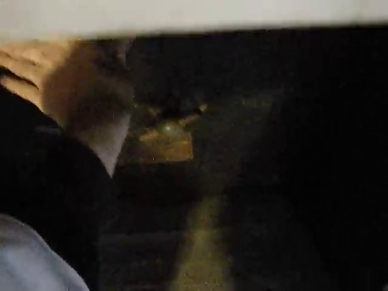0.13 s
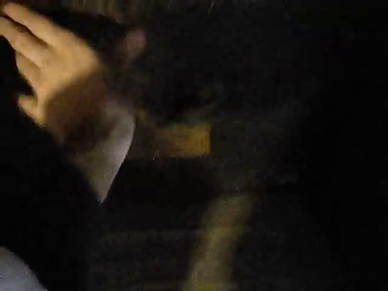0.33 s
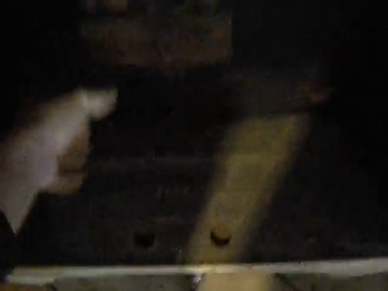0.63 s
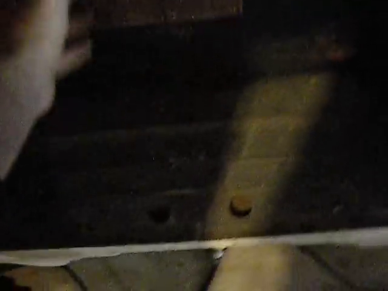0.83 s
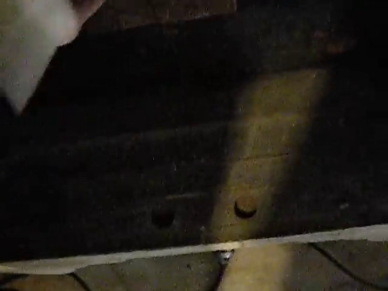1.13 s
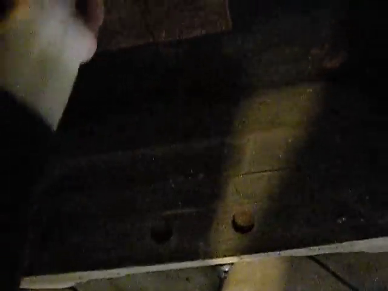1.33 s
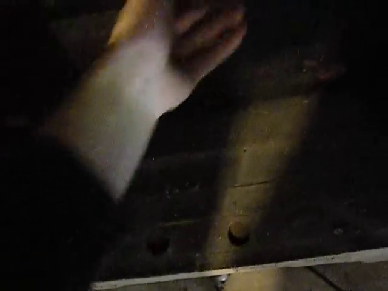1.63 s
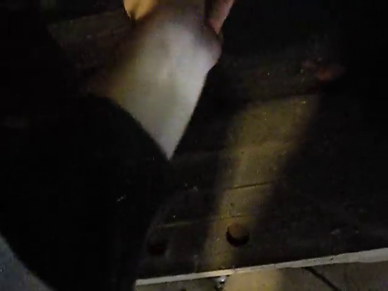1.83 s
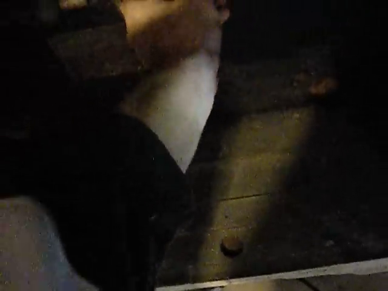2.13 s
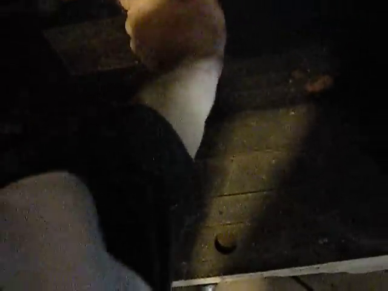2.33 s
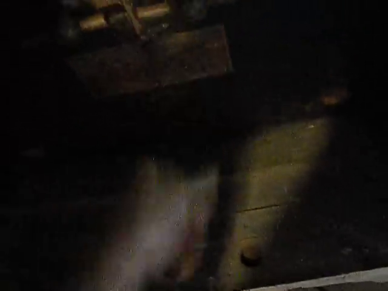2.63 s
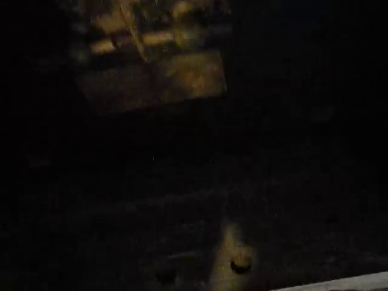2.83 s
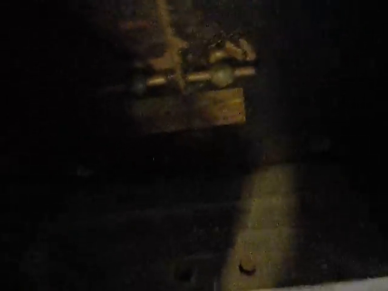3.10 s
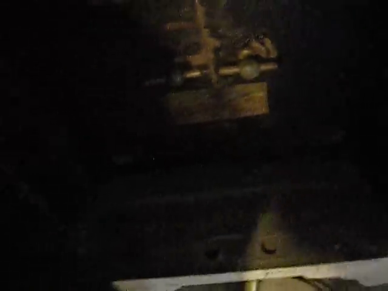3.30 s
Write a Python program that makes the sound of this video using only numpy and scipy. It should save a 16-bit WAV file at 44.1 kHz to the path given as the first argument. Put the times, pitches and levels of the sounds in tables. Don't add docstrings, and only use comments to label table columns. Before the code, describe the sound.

Heavy steel bolts are worked by hand: a soft booming door bump first, a pause, then clusters of hard clacks and a tiny squeak, in a small hard room with a droning fan; muffled hand-held microphone.

```python
import sys
import numpy as np
from scipy import signal
from scipy.fft import rfft, irfft, next_fast_len
from scipy.io import wavfile
from scipy.ndimage import uniform_filter1d, map_coordinates

SR = 44100
rng = np.random.default_rng(int(sys.argv[2]) if len(sys.argv) > 2 else 0)


def waveform_to_disk(signal):
    frames = np.transpose(np.atleast_2d(signal))
    scaled = np.clip(frames, -1, 1) * 32767
    samples = np.round(scaled).astype(np.int16)
    wavfile.write(sys.argv[1], SR, samples)


def nominal_scale(level):
    x = np.asarray(level, float) / 20
    return 10 ** x


N = 152586

# start_s, peak_db, boom_db (door against bolts), rattle_t60_s, chatter_centre_hz
BOLT_BLOWS = [(1.2902, -8.5, -14, 0.092, 2090), (1.297, -7, -2.5, 0.093, 1300),
              (1.306, -8.5, -4.5, 0.038, 2920), (1.349, -13, 2.5, 0.089, 2400),
              (1.365, -7.5, -23, 0.057, 3200), (1.3685, 5.5, -25.5, 0.029, 2320),
              (1.3735, -3.5, -10.5, 0.055, 2050), (1.3925, 1.5, -9, 0.03, 2720),
              (1.498, -25, 12.5, 0.022, 800), (1.512, -21.5, 7, 0.085, 2636),
              (1.6065, -29.5, 7.5, 0.062, 2180), (1.903, -14, -14.5, 0.063, 2360),
              (1.929, -8.5, 5.5, 0.07, 1700), (1.941, -7.5, -5, 0.073, 2300), (1.9795, -1, 0.5, .04, 2000),
              (1.984, -3.5, -9.5, 0.055, 2470), (2.001, -1.5, -4, 0.056, 3150),
              (2.1325, 13, -21, 0.028, 1730), (2.142, 5.5, -10, 0.026, 2900), (2.184, -32.5, -2, .06, 1600),
              (2.358, -16.5, 7.5, 0.049, 2770), (2.3705, -7.5, -4, 0.053, 1700),
              (2.377, -10, -8.5, 0.044, 1400), (2.65, -20.5, -17, .06, 2900)]
# start_s, peak_db, boom_db, rattle_t60_s, chatter_centre_hz
DOOR_BUMPS = [(.0915, -14, 11.5, 0.15, 1600), (.0965, -9.5, 10.5, 0.034, 2800),
              (.107, -12, -1.5, 0.21, 3000), (.117, -9, 3.5, 0.11, 1000), (.122, -5, -13.5, 0.048, 2200),
              (.134, -17, 3, 0.054, 2200), (.151, -13.5, -7.5, 0.056, 2800), (.165, -15, -3, 0.094, 2200),
              (.189, -20.5, 0, 0.13, 2200), (.228, -23, -8, 0.11, 2800), (.2514, -21, 0, 0.067, 2800),
              (.304, -27.5, -4.5, .07, 2800), (.65, -38, 4, .06, 1000)]
# pitch_hz, width_hz, level_db
BOLT_MODES = [(970, 140, -6), (1385, 11, 0.5), (1690, 52, -16.5), (1988, 29, 0.5), (2265, 16, -5),
              (2482, 36, -1.5), (2900, 8, -15), (3246, 52, -3), (3780, 13, -34.5)]
# pitch_hz, width_hz, level_db
PANEL_MODES = [(162, 49, 2), (240, 120, -2), (308, 33, 4), (378, 14.4, 1.5), (486, 50, -3.5), (605, 40, -6),
               (702, 91, -8), (787, 25, -14)]
# pitch_hz, level_db, t60_s
PANEL_RING = [
    (350.5, -9.5, 0.43),
    (376, -20, 3.2),
    (175.9, -6.5, 0.29),
]
# delay_s, level_db
SQUEAK_ECHOES = [
    (.0195, -7),
    (.033, -19),
    (.044, -17),
    (.056, -18),
    (.071, -25),
    (.086, -25),
]
# pitch_hz, t60_s
ROOM_DECAY = [(200, 0.12), (1000, .35), (4000, 0.33)]
# time_s, level_db
DRONE_LEVEL = [(0.0, -34), (0.18, -33.5), (1.35, -13.5), (1.46, -22), (1.59, -14), (1.7, -25.5),
               (1.84, -10), (1.97, -34.5), (2.1, -13), (2.21, -50), (2.26, -20), (2.61, -16.5), (2.68, -24),
               (2.76, -16.5), (3.09, -23), (3.15, -33.5), (3.24, -13.5), (3.46, -42)]
FAN_HZ = [140.5, 188, 248.6, 300, 376.5, 497, 561, 667, 747.5]
# level_db (rms), unsteadiness_db
FAN_LEVEL = [(-26, 6), (-35, 4.5), (-27.5, 2.5), (-38.5, 5.5), (-40, 4), (-41, 0.5), (-40, 3), (-47, 3),
             (-46, 3)]
# pitch_hz, level_db (per Hz)
AIR_COLOUR = [(35, -55), (60, -11.5), (130, -0.5), (188, -13), (254, -2.5), (331, -13), (840, -19.5),
              (1070, -20), (4020, -38), (5230, -74.5), (8840, -120)]
# centre_s, level_db, length_s
GRIP_SHIFTS = [
    (0.106, -26, 0.098),
    (0.204, -21.5, 0.11),
    (1.511, -33.5, 0.086),
    (1.961, -30.5, 0.11),
    (2.154, -22, 0.09),
    (2.303, -26.5, .2),
    (3.063, -15, 0.11),
    (3.21, -28.5, 0.12),
    (3.3, -18, 0.08),
    (3.365, -24, .06),
]
# pitch_hz, level_db (per Hz)
RUMBLE_COLOUR = [(15, -18.5), (30, 6.5), (50, 3), (80, -6), (130, -43)]


def unit(x):
    return x / np.sqrt(np.mean(x ** 2) + 1e-20)


def along(points, hz):
    point_hz, value = np.transpose(points)
    return np.interp(np.log(hz + 1), np.log(point_hz + 1), value)


def wobble(rate):
    return map_coordinates(rng.standard_normal(100), [np.arange(N) * rate / SR])


def filtered(x, response):
    size = next_fast_len(len(x) + 8192)
    return irfft(rfft(x, size) * response(np.fft.rfftfreq(size, 1 / SR)), size)[:len(x)]


def add(track, start_s, x):
    part = track[round(start_s * SR):][:len(x)]
    part += x[:len(part)]


def resonances(modes, f):
    total = 0
    for k, (hz, width_hz, db) in enumerate(modes):
        damping = 1j * f * width_hz
        total = total + (-1) ** k * nominal_scale(db) * damping / (hz * hz - f * f + damping)
    return total


def panel_response(f):
    return resonances(PANEL_MODES, f)


def clack(peak_db, boom_db, rattle_t60_s, centre_hz):
    t = np.arange(SR // 5) / SR
    rise = 1 - np.exp(-t / 0.0012)
    impulse = (np.arange(len(t)) == 20).astype(float)

    def steel_response(f):
        wash = nominal_scale(-13.5) * 1j * f / (700 + 1j * f)
        return (resonances(BOLT_MODES, f) + wash) * nominal_scale(-7 * np.log2((f + 1) / centre_hz) ** 2)

    grain_ms, grain_db = 1.2, 5
    grains = unit(uniform_filter1d(rng.standard_normal(len(t)), size=round(grain_ms * SR / 1000)))
    chatter = rng.standard_normal(len(t)) * nominal_scale(grain_db * grains)
    blow = filtered(impulse, steel_response)
    steel = rise * unit(filtered(chatter, steel_response)) + nominal_scale(9) * blow / np.abs(blow).max()
    steel = steel * nominal_scale(-60 * t / np.clip(rattle_t60_s, .01, .4))
    steel = steel / np.abs(steel).max()

    thump = filtered(impulse, panel_response)
    shudder = rise * unit(filtered(rng.standard_normal(len(t)), panel_response))
    boom = shudder + nominal_scale(6) * thump / np.abs(thump).max()
    boom_t60_s = 0.15
    boom = boom * nominal_scale(-5.5 + boom_db - 60 * t / boom_t60_s)
    return nominal_scale(peak_db) * (nominal_scale(6) * steel + boom)


def clacks():
    out = np.zeros(N)
    for start_s, *blow in list(DOOR_BUMPS) + list(BOLT_BLOWS):
        add(out, start_s, clack(*blow))
    t = np.arange(SR) / SR
    ring_start_s = .095
    for hz, db, t60_s in PANEL_RING:
        add(out, ring_start_s, nominal_scale(db - 60 * t / t60_s) * np.sin(2 * np.pi * hz * t))
    return out


def squeak():
    out = np.zeros(N)
    t = np.arange(SR // 20) / SR
    start_s, rise_s, hold_s, fall_s = 2.635, .012, .006, .0035
    pitch_hz, sag_hz_per_s, level_db = 2970, 790, -15.5
    side_hz, side_db = 407, -18.5
    swell = np.sin(np.pi / 2 * np.clip(t / rise_s, 0, 1)) ** 2
    fade = np.exp(-(np.maximum(t - rise_s - hold_s, 0) / fall_s) ** 2)
    flutter = 1 + 2 * nominal_scale(side_db) * np.sin(2 * np.pi * side_hz * t)
    for delay_s, db in [(0, 0.009)] + list(SQUEAK_ECHOES):
        hz = pitch_hz - sag_hz_per_s * (t + delay_s)
        phase = 2 * np.pi * np.cumsum(hz) / SR + rng.uniform(0, 2 * np.pi)
        add(out, start_s + delay_s, nominal_scale(level_db + db) * swell * fade * np.sin(phase) * flutter)
    return out


def room(x):
    out = np.zeros(N)
    step = N // 12 + 1
    for k in range(12):
        hz, t, z = signal.stft(rng.standard_normal(SR // 2), SR, nperseg=256)
        fade = nominal_scale(-60 * t / along(ROOM_DECAY, hz)[:, None])
        tail = signal.istft(z * fade, SR, nperseg=256)[1]
        wet = signal.fftconvolve(x[k * step:(k + 1) * step], tail / np.linalg.norm(tail))
        add(out, k * step / SR + .006, wet)
    return out


def drifting_tone(hz, drift_hz):
    return np.sqrt(2) * np.sin(2 * np.pi * np.cumsum(hz + drift_hz * wobble(6)) / SR)


def moving_air():
    z = signal.stft(rng.standard_normal(N + 512), nperseg=512)[2]
    patches = uniform_filter1d(rng.standard_normal(z.shape), size=5, axis=0)
    patches = uniform_filter1d(patches, size=12, axis=1)
    air = signal.istft(z * nominal_scale(.5 * unit(patches)), nperseg=512)[1][:N]
    return unit(filtered(air, lambda f: nominal_scale(along(AIR_COLOUR, f))))


def fan():
    t = np.arange(N) / SR
    drone_db = np.interp(t, *np.transpose(DRONE_LEVEL)) + 2.3 * wobble(25)
    out = nominal_scale(drone_db) * drifting_tone(119.94, 1.6)
    for hz, (db, loose_db) in zip(FAN_HZ, FAN_LEVEL):
        out += nominal_scale(db + loose_db * wobble(9)) * drifting_tone(hz, 0.44 * loose_db)
    return out + nominal_scale(-24.5) * moving_air()


def handling():
    t = np.arange(N) / SR
    swell = nominal_scale(-37)
    for centre_s, db, length_s in GRIP_SHIFTS:
        swell = swell + nominal_scale(db) * np.exp(-(2 * (t - centre_s) / length_s) ** 2)
    return swell * unit(filtered(rng.standard_normal(N), lambda f: nominal_scale(along(RUMBLE_COLOUR, f))))


def scene():
    bolts = clacks()
    thin = squeak()
    tail = nominal_scale(-16) * room(bolts + .4 * thin)
    return (bolts + thin + tail + fan() + handling())[None]


def band_limit(x):
    top_hz, width_hz, stop_hz = 4205, 185, 4900

    def response(f):
        slope = 1 / (1 + np.exp(np.clip((f - top_hz) / width_hz, -50, 50)))
        return slope * np.clip((stop_hz - f) / 400, 0, 1) ** 2

    return filtered(x, response)


def duck(x):
    power = x ** 2
    for lag_s in (0.045, 0.3):
        keep = np.exp(-1 / (lag_s * SR))
        power = signal.lfilter([1 - keep], [1, -keep], power)
    return x / (1 + power / nominal_scale(-21.5) ** 2) ** 0.19


def top_cut(x):
    return signal.sosfilt(signal.butter(12, 15850, fs=SR, output="sos"), x)


def record(dry):
    x = duck(band_limit(dry[0]))
    x = np.clip(x, -.705, .705)
    x = np.clip(band_limit(x), -.72, .72)
    return top_cut(x[None])


dry = scene()
out = record(dry)
waveform_to_disk(out)
```